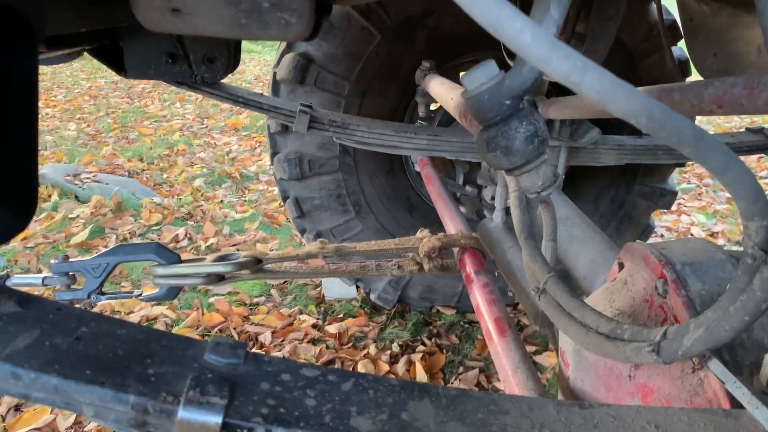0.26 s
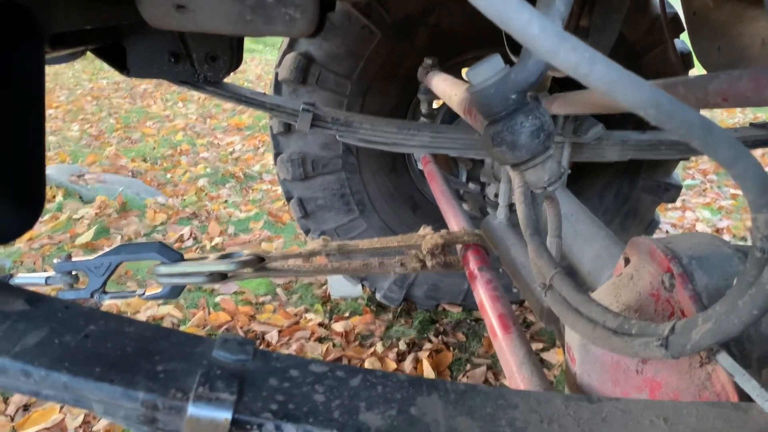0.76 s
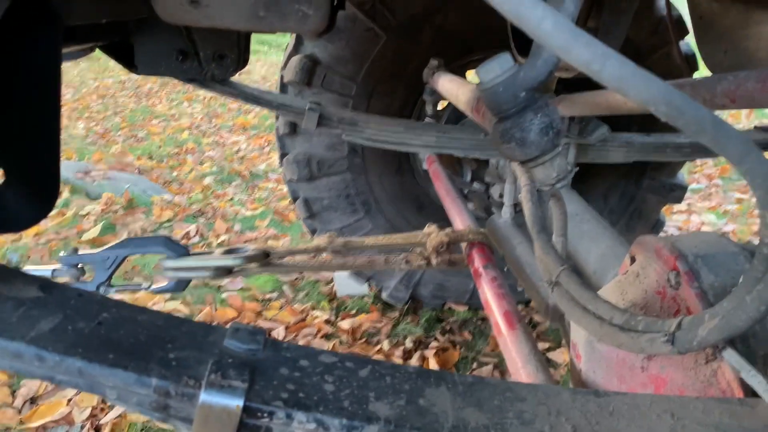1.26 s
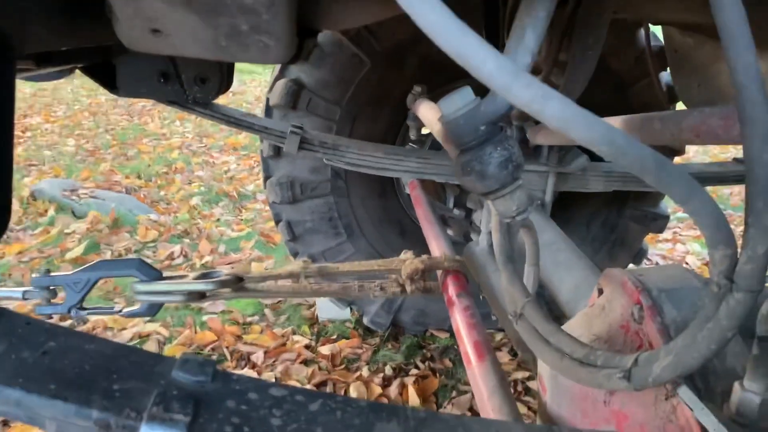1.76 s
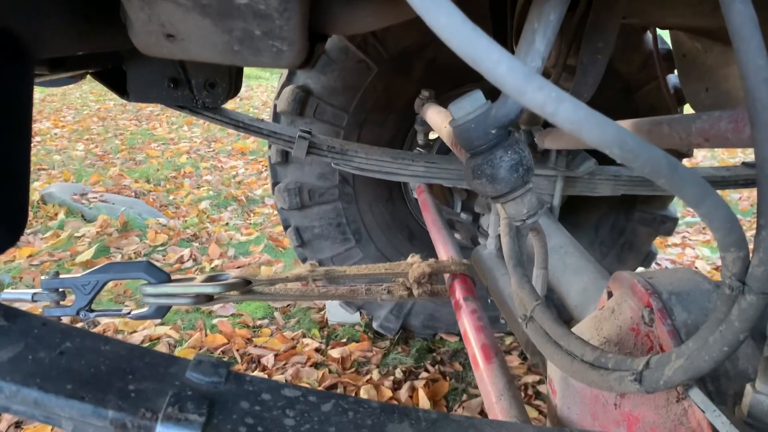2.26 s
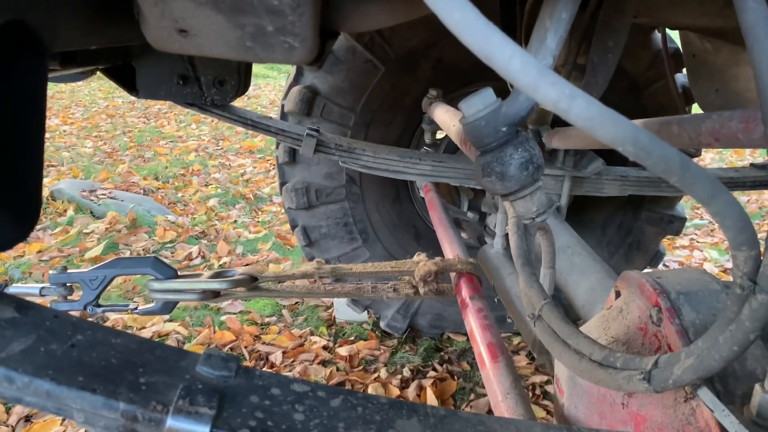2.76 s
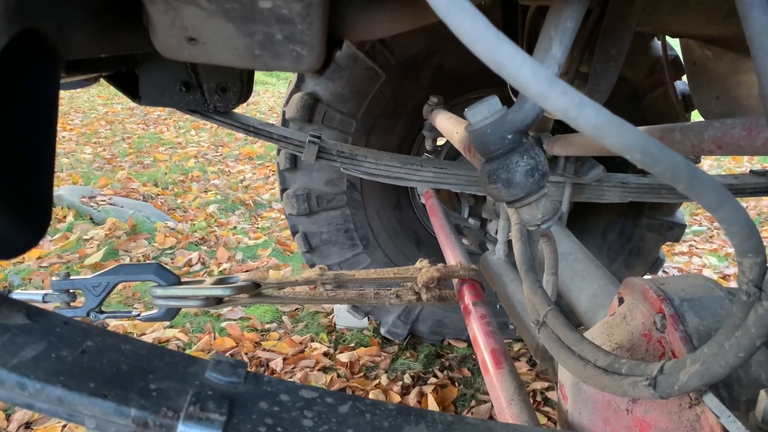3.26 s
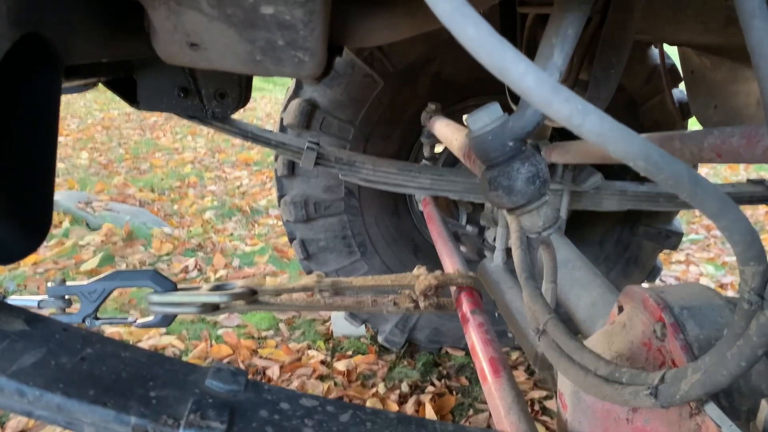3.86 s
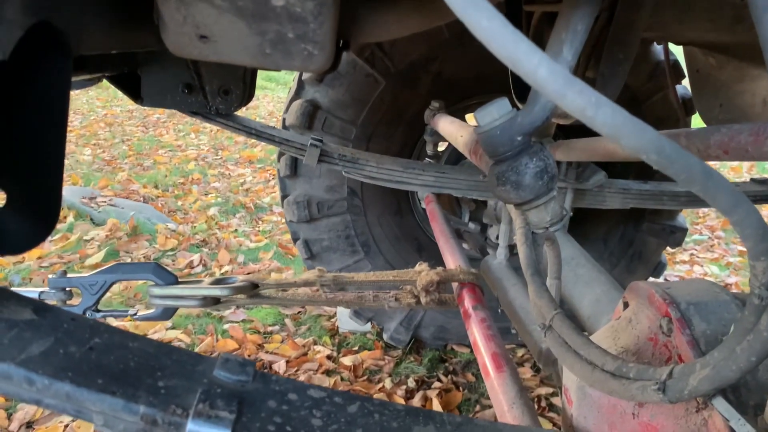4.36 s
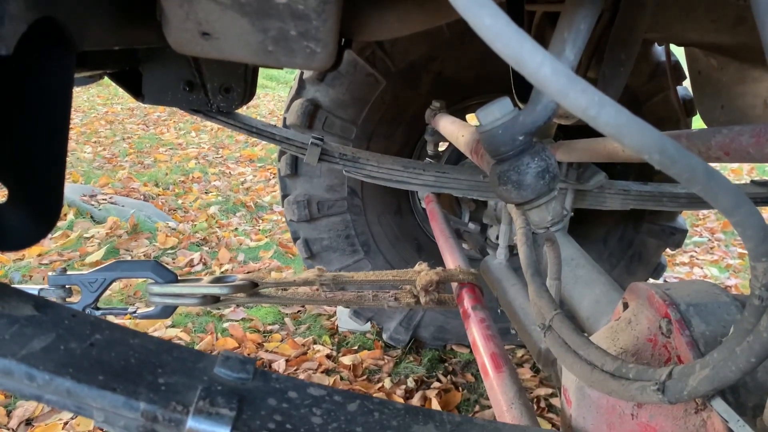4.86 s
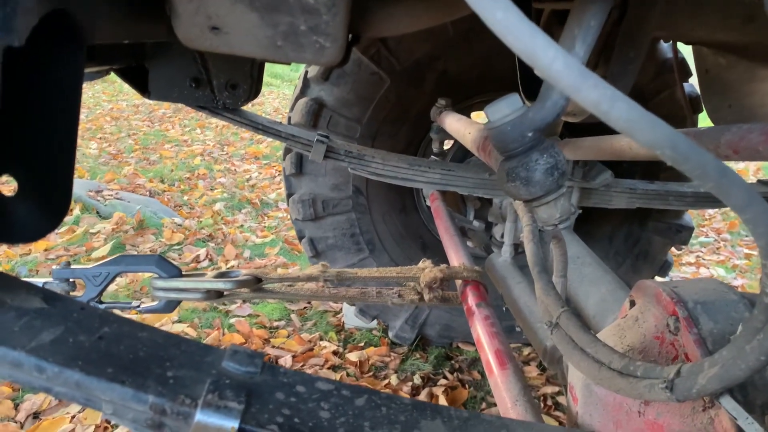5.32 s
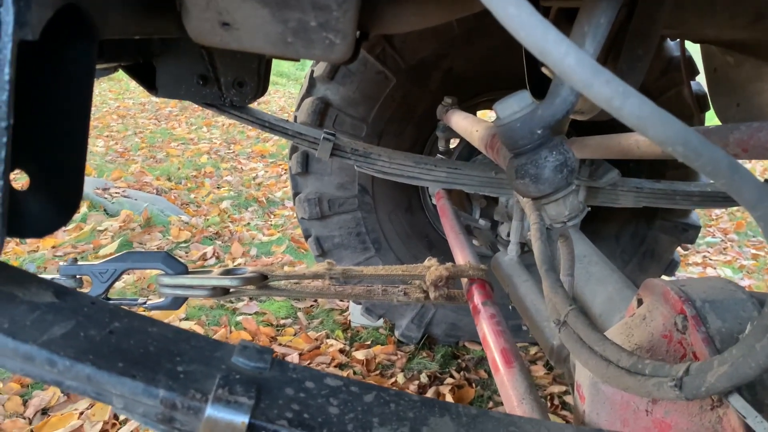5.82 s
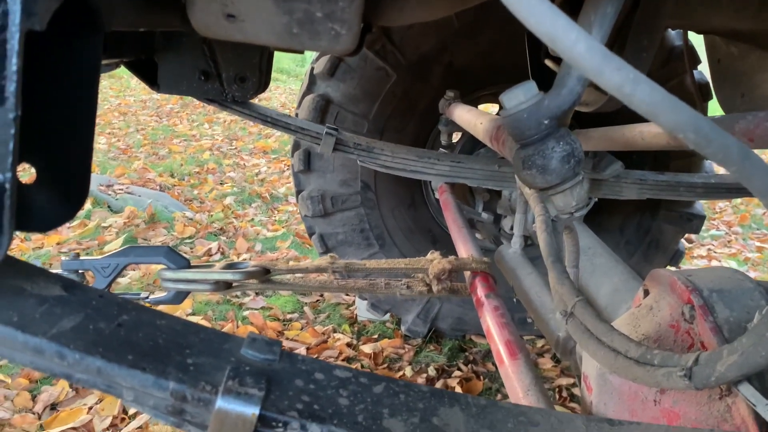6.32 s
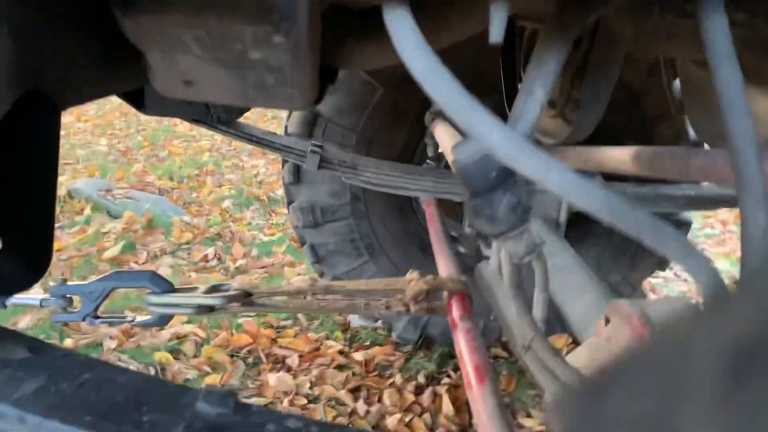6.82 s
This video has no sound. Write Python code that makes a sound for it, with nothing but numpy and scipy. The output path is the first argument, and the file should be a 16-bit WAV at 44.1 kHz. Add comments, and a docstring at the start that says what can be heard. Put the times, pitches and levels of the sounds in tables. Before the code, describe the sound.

Electric winch under an off-road vehicle jogged in short whining, rattling bursts, each ending in a ringing metallic clack, with hand-handling noise outdoors.

```python
"""An electric winch under an off-road vehicle, jogged in short bursts to tension a strap, outdoors.
Tooth blows and gear tones follow one speed curve per jog: clack, spin-up, whine, rattle, coast, locking clack.
Top speed falls from jog to jog as the strap tightens; bright scrapes mark the tight spot of the gear train.
Filtered noise bursts make the clacks and switch ticks; decaying modes make the lock ring and the jerks.
Around it: stick-slip noise of a hand on the camera, soft rustles, and a low rumble of filtered noise."""
import sys
import numpy as np
from scipy import signal
from scipy.fft import rfft, irfft, next_fast_len
from scipy.io import wavfile
from scipy.ndimage import uniform_filter1d

SR = 44100
rng = np.random.default_rng(int(sys.argv[2]) if len(sys.argv) > 2 else 0)


def transcribe(u):
    """Save the signal u as a 16-bit wav file named by the first command-line argument.

    u: samples, shape (n,) or (channels, n), limited to [-1, 1]; the rate is SR.
    q: integer samples, one column per channel.
    """
    v = np.clip(np.atleast_2d(u).T, -1, 1)
    q = np.round(v * 32767).astype(np.int16)
    wavfile.write(sys.argv[1], SR, q)


N = 312448
TIME = np.arange(N) / SR
HZ = np.fft.rfftfreq(N, 1 / SR)

# Jogs, the first already running out. Each row: start in seconds, power off in seconds, first tooth rate
# in Hz, top tooth rate in Hz, offsets of rattle, housing and frame in dB, start clack in dB,
# tint of its bright knock in dB.
JOGS = [(-0.6, -0.17, 302, 635, -1.5, -1.5, -3.5, -28, 2),
        (0.461, 0.905, 240.3, 636.9, 2.1, -1.5, 1, -30.5, -7),
        (1.957, 2.441, 300.6, 625.1, 1.85, 0.1, 0.5, -30.5, 6.5),
        (3.755, 4.325, 368.4, 607.6, 2.4, 0.8, 1.6, -32.5, 3),
        (4.981, 5.443, 333.9, 591.4, 0.33, 1, 0.5, -36.5, 1.5),
        (5.857, 6.309, 354.3, 575, 0.5, 1, 0.9, -32, 4)]
# Lock catching at the end of each jog. Each row: time in seconds, level in dB, strongest ring in Hz,
# its relative level in dB, its t60 in seconds, then the tint in each of four bands in dB.
LOCKS = [(0.072, -22.5, 2640, -7, 0.21, 6, -1, 7, -4), (1.132, -22.5, 2815, -8, 0.21, 0, 4, 7.5, -6),
         (2.5943, -22.5, 2090, -3.5, 0.18, 7, -0.5, 0, 2.5), (4.5273, -27, 1556, -1, 0.18, 9, 3.5, 8, -3),
         (5.5718, -20, 2790, -16, 0.36, 8.5, -9, 4.5, -8), (6.429, -24, 2770, -10, 0.37, 7.5, -0.5, 10, -2)]
# Spectrum of skin or fingertips on the camera case. Each row: frequency in Hz, relative density in dB.
RUB_SPECTRUM = [(100, -7.5), (430, -3.5), (680, 4), (1050, -7.5), (1550, -27.5), (1950, -18), (2350, -27),
                (2700, -26), (3200, -35), (3850, -24), (5000, -38), (6400, -33), (8200, -53.5),
                (12000, -91)]


def amp(db):
    """Decibels to gain."""
    return 10 ** (np.asarray(db) / 20)


def unit(x):
    """Scales to rms 1."""
    return x / np.sqrt(np.mean(x ** 2) + 1e-20)


def read(points):
    """Interpolates a (Hz, dB) table onto the frequency grid, on a log frequency axis."""
    hz, value = np.transpose(points)
    return np.interp(np.log(HZ + 1), np.log(hz), value)


def colour(x, gain):
    """Causal minimum-phase filter with the given gain, by folding the cepstrum."""
    cepstrum = irfft(np.log(np.maximum(gain, 1e-5)), N)
    cepstrum[1:N // 2] *= 2
    cepstrum[N // 2 + 1:] = 0
    return irfft(rfft(x) * np.exp(rfft(cepstrum)), N)


def resonances(modes):
    """Gain of summed resonances, top 1; half amplitude one width off each centre."""
    power = sum(amp(db) ** 2 / (1 + ((HZ - hz) / width) ** 2) ** 2 for hz, width, db in modes)
    return np.sqrt(power / power.max())


def noise():
    """Two unrelated white noises."""
    return rng.standard_normal((2, N))


def wander(rate_hz):
    """Slow random motion of rms 1: noise under a Gaussian low-pass."""
    size = next_fast_len(N, True)
    hz = np.fft.rfftfreq(size, 1 / SR)
    slow = rfft(rng.standard_normal(size)) * np.exp(-(hz / rate_hz) ** 2)
    return unit(irfft(slow, size)[:N])


def steady(x, window_s=0.088):
    """Evens out the short-time rms to about 1."""
    power = uniform_filter1d(x ** 2, int(window_s * SR) + 1, axis=-1)
    return x / np.sqrt(power + 1e-12)


def patchy(pair, narrow_db=4.0, broad_db=2.0):
    """Narrow bands flare and fade for some hundredths of a second, over slower shifts of broad colour."""
    z = signal.stft(pair, nperseg=1024, noverlap=768)[2]
    narrow, broad = rng.standard_normal((2, *z.shape[1:]))
    for _ in range(2):
        narrow = uniform_filter1d(uniform_filter1d(narrow, size=2, axis=0), size=7, axis=1)
        broad = uniform_filter1d(uniform_filter1d(broad, size=12, axis=0), size=11, axis=1)
    gain = amp(narrow_db * unit(narrow) + broad_db * unit(broad))
    return signal.istft(z * gain, nperseg=1024, noverlap=768)[1][:, :N]


def strokes(rows, axis, fullness, soften_s=0.014):
    """Gain curve of smoothed sine arches; a small fullness exponent flattens their tops."""
    out = np.zeros(N)
    for row in rows:
        start, length = row[:2]
        inside = (TIME > start) & (TIME < start + length)
        arch = np.sin(np.pi * (TIME[inside] - start) / length) ** abs(fullness)
        out[inside] += amp(row[axis]) * arch
    window = np.hanning(int(2 * soften_s * SR) + 3)
    return signal.fftconvolve(out, window / window.sum(), "same")


def rough_tones(rows, rough_rad, rough_hz, waver_db):
    """Short gliding tones, roughened by random phase and level."""
    out = np.zeros((2, N))
    for start, length, db, from_hz, to_hz in rows:
        span = (TIME > start) & (TIME < start + length)
        u = (TIME[span] - start) / length
        knots = np.arange(0, length + 1, 1 / rough_hz)
        glide = 2 * np.pi * np.cumsum(from_hz + (to_hz - from_hz) * u) / SR
        for channel in out:
            jitter = np.interp(u * length, knots, rng.standard_normal(len(knots)))
            waver = np.interp(u * length, knots, rng.standard_normal(len(knots)))
            tone = np.sin(glide + rough_rad * jitter)
            channel[span] += amp(db) * unit(tone * amp(waver_db * waver) * np.sin(np.pi * u) ** .5)
    return out


def underbody(pair, t60_s=.12, wet_db=-3):
    """Short dense reflections between the steel parts and the ground, as decaying noise tails."""
    t = TIME[:SR // 3]
    tail = rng.standard_normal((2, len(t))) * amp(-60 * t / t60_s)
    tail /= np.linalg.norm(tail, axis=1, keepdims=True)
    wet = signal.fftconvolve(pair, tail, axes=1)[:, :N]
    return (pair + amp(wet_db) * wet) / np.sqrt(1 + amp(wet_db) ** 2)


def clacks(rows, spectrum, hold_s, t60_s, gain_db, tail_db=-24, tail_t60_s=0.36, lead_s=.004,
           lead_db=-6, bands_hz=(), band_width=0.18):
    """Metal closes in, chatters and dies away; rows hold time, level and a tint per band (s, dB, dB..)."""
    early = SR // 40  # samples kept ahead of the blow
    t, out = TIME[:SR // 2] - early / SR, np.zeros((2, N))
    after = np.maximum(t - hold_s, 0)
    closing = amp(lead_db) * np.exp(-abs(t) / lead_s)
    dying = amp(-60 * after / t60_s) + amp(tail_db - 60 * after / tail_t60_s)
    shape = np.where(t < 0, closing, dying)
    grains = underbody(noise() * amp(1.6 * wander(460)), t60_s=0.079, wet_db=-0.5)
    chatter = unit(colour(grains, amp(read(spectrum))))
    hz = np.fft.rfftfreq(len(t), 1 / SR) + 1
    for s, db, *tints in rows:
        first = round(s * SR) - early
        span = slice(first, first + len(t))
        tint_db = sum(d * np.exp(-(np.log(hz / centre) / band_width) ** 2)
                      for centre, d in zip(bands_hz, tints))
        blow = irfft(rfft(chatter[:, span]) * amp(tint_db), len(t))
        out[:, span] += blow * shape * amp(db + gain_db)
    return out


def port_lead(delay_s):
    """Which port leads at each frequency when the left one hears the sound delay_s earlier."""
    return np.tanh(3 * np.sin(2 * np.pi * HZ * delay_s))


def spread(pair, width, direct, lead):
    """Left and right: direct sound leads at one port (+1 left, -1 right), the rest of the side is diffuse."""
    mid, other = rfft(pair)
    led = np.clip(direct, 0, 1) * lead
    side = amp(read(width)) * (1j * led * mid + np.sqrt(1 - led ** 2) * other)
    return irfft(np.array([mid + side, mid - side]), N)


def outdoors(waver_db=3.0, split_hz=320, air_db=-39.5):
    """Low distant rumble that swells, under steadier air: one coloured noise split into two bands."""
    # Each row: time in seconds, gain of the low band in dB.
    swell_points = [(0.0, -26.5), (0.42, -42.5), (1.2, -36), (1.66, -40.5), (2.7, -38.5), (4.1, -37.5),
                    (4.87, -44.5), (5.6, -34.5), (5.85, -40), (6.58, -35), (7.08, -44)]
    # Each row: frequency in Hz, relative density in dB.
    air_spectrum = [(15, -32), (25, -9), (133, -1), (164, -6), (227, -11), (281, -11.5), (322, -19),
                    (919, -19.5), (1950, -36), (2230, -44), (2420, -43), (13900, -78.5), (15500, -95)]
    swell_db = np.interp(TIME, *np.transpose(swell_points))
    air = unit(colour(noise(), amp(read(air_spectrum))))
    low = signal.sosfilt(signal.butter(3, split_hz, "low", fs=SR, output="sos"), air)
    high = signal.sosfilt(signal.butter(3, split_hz, "high", fs=SR, output="sos"), air)
    return low * amp(swell_db + waver_db * wander(14.7)) + high * amp(air_db + 0.8 * wander(5))


def rustle(uneven_db=1.5):
    """Soft, uneven dry rustle as the camera is drawn back: grainy coloured noise."""
    # Each row: start in seconds, length in seconds, level in dB.
    rustle_rows = [(6.52, 0.14, -46), (6.76, 0.13, -61.5), (6.9, 0.18, -61)]
    # Each row: frequency in Hz, relative density in dB.
    dry_spectrum = [(700, -18), (2000, -4), (4000, -8), (7000, -15), (9000, -17), (15000, -10.5)]
    grains = colour(noise() * amp(2.2 * wander(140)), amp(read(dry_spectrum)))
    return unit(grains) * strokes(rustle_rows, axis=2, fullness=0.63) * amp(uneven_db * wander(16))


def squeaks():
    """Fingers squeak and bump on the camera: short rough glides."""
    # Each row: start in seconds, length in seconds, level in dB, from Hz, to Hz.
    squeak_rows = [(6.503, 0.04, -49.5, 525, 760), (6.535, 0.067, -33, 118.6, 39.8),
                   (6.587, 0.033, -36.5, 644, 391), (6.642, 0.027, -45, 716, 664)]
    return rough_tones(squeak_rows, rough_rad=.7, rough_hz=201, waver_db=4.5)


def taps():
    """Fingertips land on the camera case: short bursts with the rub's spectrum."""
    # Each row: time in seconds, level in dB ahead of gain_db.
    tap_rows = [(1.226, -31), (1.593, -39), (1.78, -41), (2.863, -40), (2.942, -37.5), (3.157, -36),
                (6.594, -31)]
    return clacks(tap_rows, RUB_SPECTRUM, hold_s=0.004, t60_s=0.077, gain_db=-2.5, tail_t60_s=0.1,
                  lead_s=0.0015)


def hand(body_db=0.33, grain_db=1.1, uneven_db=2.5, hiss_db=3, hiss_hz=11700, hiss_width_hz=1100):
    """Skin sticks and slips on the camera case: grainy body noise plus a fine resonant hiss."""
    # Each row: start in seconds, length in seconds, body in dB, fine hiss in dB; both ahead of the gains.
    rub_rows = [(1.219, 0.06, -29.5, -57), (1.31, 0.42, -32.5, -54.5), (1.588, 0.041, -55, -52),
                (1.775, 0.18, -31, -66), (1.835, 0.059, -32, -73), (2.855, 0.22, -37.5, -91),
                (3.05, 0.14, -33.5, -66), (3.475, 0.145, -41, -83), (4.664, 0.064, -38.5, -72),
                (6.505, 0.072, -32.5, -51.5), (6.587, 0.059, -37, -53)]
    slips = noise() * amp(grain_db * wander(200))
    body = steady(colour(slips, amp(read(RUB_SPECTRUM)))) * strokes(rub_rows, axis=2, fullness=0.5)
    body *= amp(body_db + uneven_db * wander(32.1))
    hiss = unit(colour(slips, resonances([(hiss_hz, hiss_width_hz, 0)])))
    hiss *= strokes(rub_rows, axis=3, fullness=1.4)
    return body + amp(hiss_db) * hiss


def switch_ticks():
    """The switch ticks: very short bright bursts."""
    # Each row: time in seconds, level in dB ahead of gain_db.
    tick_rows = [(0.342, -35.5), (1.8322, -55), (3.1194, -36), (3.6346, -33), (3.6554, -38.5),
                 (4.6718, -39), (4.859, -39), (4.8911, -45), (5.6618, -28), (5.7294, -37)]
    # Each row: frequency in Hz, relative density in dB.
    tick_spectrum = [(200, 5), (470, 12), (800, 5), (1200, 15), (1700, 6), (2400, 10), (3400, -5),
                     (6000, -3.5), (8000, -13), (12000, -2), (15000, 2)]
    return clacks(tick_rows, tick_spectrum, hold_s=0.0015, t60_s=0.031, gain_db=-5.0, tail_db=-20,
                  tail_t60_s=0.15, lead_s=0.0012)


def start_clacks():
    """Power comes on: a bright snap of the contacts and a heavier clack with a knock near 4 kHz."""
    # Both spectra, each row: frequency in Hz, relative density in dB.
    snap_spectrum = [(5000, -31), (10000, -2), (15000, 8)]
    clack_spectrum = [(100, -52.5), (300, -21), (400, -9), (520, 2), (680, -6), (950, -20), (2000, -18.5),
                      (2700, -20), (3400, -25.5), (4200, -15.5), (5500, -36.5), (8000, -28), (12000, -18.5),
                      (15000, -22.5)]
    starts = [(s, db, knock_db) for s, *_, db, knock_db in JOGS if s > 0]
    snap = clacks(starts, snap_spectrum, hold_s=.005, t60_s=.025, gain_db=5.0, tail_db=-26,
                  tail_t60_s=.1, lead_s=.002)
    return snap + clacks(starts, clack_spectrum, hold_s=0.0086, t60_s=0.06, gain_db=13.5,
                         lead_s=0.0044, lead_db=0.0, bands_hz=[4000])


def lock_clacks():
    """The lock catches: a broadband clack, tinted differently each time."""
    # Each row: frequency in Hz, relative density in dB.
    stop_spectrum = [(100, 4), (200, 5.5), (400, 2.5), (700, 8), (1100, 0.5), (1500, -1), (2200, 3),
                     (2800, -1), (3400, -5.5), (4200, 2.5), (6000, -16), (8500, -18), (12000, -16),
                     (15000, -13.5)]
    # Centres of the four tinted bands in Hz.
    tint_bands_hz = [1460, 1870, 2820, 4430]
    stops = [(s, db, *tints) for s, db, _, _, _, *tints in LOCKS]
    return clacks(stops, stop_spectrum, hold_s=0.0108, t60_s=0.1, gain_db=-2.5, tail_db=-20.5,
                  tail_t60_s=0.42, lead_s=0.004, lead_db=-2.5, bands_hz=tint_bands_hz)


def lock_ring(ring_db=-7, rise_s=0.0054):
    """The lock rings on after each stop: decaying modes plus one of its own per stop."""
    # Each row: frequency in Hz, level in dB ahead of ring_db, t60 in seconds.
    lock_modes = [(675, -4.5, 0.4), (1250, -9.5, 0.24), (1420, -9, 0.36), (1490, -12, 0.25),
                  (1820, -10, 0.27), (2020, -29.5, 0.36), (2230, -12, 0.22), (2790, -16, 0.36),
                  (2880, -18, .14), (3670, 10.5, 0.044), (4000, -0.5, 0.1), (5370, -6, 0.085)]
    t, out = TIME[:SR // 2], np.zeros((2, N))
    for s, db, main_hz, main_db, main_t60_s, *_ in LOCKS:
        modes = [(hz, d + ring_db, t60_s) for hz, d, t60_s in lock_modes]
        modes.append((main_hz, main_db, main_t60_s))
        ring = sum(amp(d - 60 * t / t60_s) * np.sin(2 * np.pi * (hz * t + rng.random((2, 1))))
                   for hz, d, t60_s in modes)
        part = out[:, round(s * SR):][:, :len(t)]
        part += (amp(db) * ring * (1 - np.exp(-t / rise_s)))[:, :part.shape[1]]
    return out


def jerks(rise_s=0.0032, ring_t60_s=0.09, crack_db=-19, crack_t60_s=0.01, thud_db=-12, thud_hz=215,
          thud_t60_s=0.081):
    """The load jerks the housing: a decaying ring, a dull crack and a thud in the frame."""
    # Each row: time in seconds, level in dB, ring in Hz.
    jerk_rows = [(0.71, -6.5, 646), (0.744, -4, 630), (2.263, -3, 610), (2.282, 0, 646),
                 (3.867, -18.5, 563), (4.136, -5.5, 602), (5.069, -10, 630), (5.235, -0.5, 635),
                 (5.664, -24, 495.4), (5.949, -13, 560), (5.976, -15.5, 595), (6.124, -12.5, 564),
                 (6.283, -10.5, 589.6)]
    t, out = TIME[:SR // 4], np.zeros((2, N))
    for s, db, hz in jerk_rows:
        ring = np.sin(2 * np.pi * hz * t) * amp(-60 * t / ring_t60_s)
        thud = np.sin(2 * np.pi * thud_hz * t) * amp(thud_db - 60 * t / thud_t60_s)
        dull = signal.lfilter([1], [1, -1.5, .6], rng.standard_normal((2, len(t))))
        crack = unit(dull)
        crack *= amp(crack_db - 60 * t / crack_t60_s)
        out[:, round(s * SR):][:, :len(t)] += amp(db) * ((ring + thud) * (1 - np.exp(-t / rise_s)) + crack)
    return out


def groans():
    """The frame groans as the motor runs down: rough falling tones."""
    # Each row: start in seconds, length in seconds, level in dB, from Hz, to Hz.
    groan_rows = [(1.0, 0.08, -29.5, 247.7, 171), (2.42, 0.06, -30, 262, 231),
                  (2.475, 0.06, -27, 218.3, 130), (4.36, 0.22, -32, 261.7, 235.5),
                  (5.44, 0.075, -38.5, 272.6, 125), (5.64, 0.06, -37, 201.6, 195)]
    return rough_tones(groan_rows, rough_rad=0.9, rough_hz=90, waver_db=4)


def singing():
    """The gearbox sings for a while under load: gliding tones."""
    # Each row: start in seconds, length in seconds, level in dB, from Hz, to Hz.
    singing_rows = [(0.58, 0.084, -32, 2930, 2990), (0.69, 0.14, -47, 4860, 5160),
                    (2.12, 0.13, -31.5, 1785, 1860), (2.24, 0.18, -48, 1720, 1650),
                    (4.09, 0.32, -32, 1633, 1670), (4.22, 0.188, -35.5, 1806, 1830),
                    (6.04, 0.38, -37.5, 1682, 1647)]
    return rough_tones(singing_rows, rough_rad=0.43, rough_hz=129.0, waver_db=-0.5)


def motion(flutter=.005, spin_up_s=0.08, lock_hz=361.4, coast_bend=1.4, teeth_per_turn=88):
    """The motor spins up exponentially, pulls, and coasts ever faster down to lock_hz, where it locks."""
    # One pass of the tight spot in each jog, in seconds.
    tight_spots_s = [-0.2, 0.700, 2.270, 4.173, 5.225, 6.106]
    latest = np.maximum(np.searchsorted([row[0] for row in JOGS], TIME, side="right") - 1, 0)
    start, off, first_hz, top_hz, rattle_db, housing_db, frame_db, *_ = np.array(JOGS)[latest].T
    lock = np.array(LOCKS)[latest, 0]
    age = np.maximum(TIME - start, 0)
    coast = np.clip((TIME - off) / (lock - off), 0, 1)
    hz = top_hz + (first_hz - top_hz) * np.exp(-age / spin_up_s)
    hz += (lock_hz - hz) * coast ** coast_bend
    teeth = np.cumsum(hz * (1 + flutter * wander(40))) / SR
    turns = (teeth - np.interp(tight_spots_s, TIME, teeth)[latest]) / teeth_per_turn
    return dict(teeth=teeth, turns=turns, age=age, coast=coast, since_off=TIME - off,
                since_lock=TIME - lock, rattle_db=rattle_db, housing_db=housing_db, frame_db=frame_db)


def envelope(run, level_db, start_db, build_s, coast_db, bend, throb_db, lag_turns, fall_s, rise_s=0.011):
    """Gain of one part: moves off its start level, throbs once a turn, sinks in the coast, dies after lock."""
    db = level_db + start_db * np.exp(-(run["age"] / build_s) ** 2) + coast_db * run["coast"] ** bend
    db += throb_db * np.cos(2 * np.pi * (run["turns"] - lag_turns))
    rise = np.minimum(run["age"] / rise_s, 1)
    return amp(db) * rise * np.clip(1 - run["since_lock"] / fall_s, 0, 1)


def pulling(run, spin_up_s, slack_s=0.033, let_go_s=0.084):
    """1 while the motor pulls at speed, ramping from 0 at the start and back after power off."""
    ramp_up = np.clip((run["age"] - slack_s) / spin_up_s, 0, 1)
    return ramp_up * np.clip(1 - run["since_off"] / let_go_s, 0, 1)


def running_up(run, centre_s=0.08, width_s=0.045):
    """1 in mid run-up, where the teeth sing cleanly before the load shakes the housing."""
    return np.exp(-((run["age"] - centre_s) / width_s) ** 2)


def tooth_blows(teeth, uneven_db=5, hiss=0.5):
    """One uneven blow for each tooth, over the hiss of sliding metal."""
    hit = np.diff(np.floor(teeth), prepend=0) > 0
    blows = hit * amp(uneven_db * np.clip(noise(), -2, 2)) * np.sign(noise())
    return unit(blows) + hiss * noise()


def scrapes(teeth, swell_s=0.02, fade_s=0.022):
    """The tight spot of the gear train scrapes past: a bright swell of tooth noise each time."""
    # Each row: time in seconds, level in dB.
    scrape_rows = [(0.552, -31), (0.698, -28.5), (0.838, -26.5), (2.117, -30), (2.272, -31), (2.402, -31),
                   (3.865, -26), (4.021, -25), (4.176, -23), (4.316, -25), (5.064, -30.5), (5.223, -25.5),
                   (5.375, -26), (5.931, -28.5), (6.101, -25.5), (6.268, -27.5)]
    # Each row: frequency in Hz, relative density in dB.
    scrape_spectrum = [(1000, -27), (2500, -16), (3800, 8), (4700, -0.5), (5900, 0), (6800, 11), (7500, 2),
                       (8350, 13), (9000, 0), (12000, -11.5), (15000, -8.5)]
    swell = np.zeros(N)
    for s, db in scrape_rows:
        peak = 1 / (1 + ((TIME - s) / np.where(TIME < s, swell_s, fade_s)) ** 2)
        swell += amp(db) * peak * np.exp(-((TIME - s) / (4 * swell_s)) ** 2)
    rasp = patchy(underbody(tooth_blows(teeth), t60_s=0.014, wet_db=3.5), narrow_db=7.0)
    return steady(colour(rasp, amp(read(scrape_spectrum)))) * swell


def growl(teeth, shaking, count=6, order_db=(-8, -7, -12), throb_db=3):
    """The shaft shakes the frame on its three lowest orders, which sink as it runs down."""
    turn = 2 * np.pi * teeth / count
    orders = [amp(db) * unit(np.sin(k * turn) * amp(throb_db * wander(22.0)))
              for k, db in enumerate(order_db, 1)]
    return sum(orders) * shaking


def mount(drive, mount_db=0.5):
    """Narrow modes of the steel mount, fed by noise at the rattle's level and ringing on after it."""
    # Each row: frequency in Hz, width in Hz, level in dB ahead of mount_db, phase between ports in radians.
    steel_modes = [(870, 28, -10, 3.2), (996, 12, -7.5, 2.9), (1101, 17, -14, 1.87),
                   (1183, 13, -12.5, 0.36), (1400, 39, -6.5, 2.44), (1552, 16, -5, 2.6),
                   (1815, 20, -15, 0.42), (2151, 38, -16.5, 0.67), (3825, 34, -14.5, 0.5),
                   (4000, 59, -23.5, 0.85), (4150, 28, -15.5, 0.72), (4940, 23, -36.5, .8)]
    t, out = TIME[:SR // 2], np.zeros((2, N))
    for hz, width, db, phase in steel_modes:
        ring = np.exp((2j * np.pi * hz - np.pi * width) * t)
        mode = signal.fftconvolve(drive * rng.standard_normal(N), ring / np.linalg.norm(ring.real))[:N]
        out += amp(db + mount_db) * (mode * np.exp(.5j * phase * np.array([[1], [-1]]))).real
    return out


def grind(teeth, count=6, size=400, shift_hz=7):
    """Rough flanks of the six-tooth pinion repeat each turn; contact wanders between two tracks on them."""
    flanks = rng.standard_normal((2, 2, size)) * amp(2.4 * rng.standard_normal((2, 2, size)))
    place = teeth / count % 1 * size
    inner, outer = np.array([[np.interp(place, np.arange(size), flank) for flank in track]
                             for track in flanks])
    shift = np.pi / 2 * wander(shift_hz)
    return unit(inner * np.cos(shift) + outer * np.sin(shift))


def backlash(metal, per_s=130, uneven_db=3, backlash_db=-12, dull_hz=4000):
    """Loose teeth slap across their play at random moments: short, dry knocks."""
    slaps = (rng.random(N) < per_s / SR) * amp(uneven_db * np.minimum(rng.exponential(1, N), 2))
    dull_metal = metal / (1 + (HZ / dull_hz) ** 4)
    return unit(colour(slaps * np.sign(noise()), dull_metal)) * amp(backlash_db)


def overtones(run, rattling, swell_db=4, rough_rad=0.74, spin_up_s=0.075):
    """Higher gear tones rise with the speed and swell at random, as if crossing resonances."""
    # Each row: multiple of the tooth rate, level in dB.
    overtone_rows = [(1.999, -16.5), (2.74, -14.5), (3, -11.5), (4, -18.5), (5, -18.5), (5.999, -15.5),
                     (6.999, -13.5)]
    out = np.zeros((2, N))
    for multiple, db in overtone_rows:
        phase = 2 * np.pi * (multiple * run["teeth"] + rng.random((2, 1)))
        tone = np.sin(phase + rough_rad * wander(80))
        out += amp(db) * unit(tone * amp(swell_db * np.clip(wander(23), -1.5, 1.5)))
    return underbody(out * pulling(run, spin_up_s), t60_s=0.093, wet_db=1.5) * rattling


def whine(run, droning, whine_db=-4.0, waver_db=2.5, loose_rad=0.7, tight_rad=0.44, settle_s=0.27,
          spin_up_s=0.12):
    """Tone of the meshing teeth: rough while they have play, cleaner once the load holds them together."""
    play = loose_rad + (tight_rad - loose_rad) * pulling(run, settle_s)
    play *= 1 - .5 * running_up(run)
    quarter_turn = np.array([[0], [np.pi / 2]])
    tone = np.sin(2 * np.pi * run["teeth"] + play * wander(52) + quarter_turn)
    tone = unit(tone * amp(waver_db * np.clip(wander(80), -2, 1.3)))
    return tone * amp(whine_db) * pulling(run, spin_up_s) * droning


def gears(teeth, rattling, droning, shaking, ring_db=2, drone_db=-5, grind_db=-4):
    """Tooth blows ring the gearbox (rattle), its housing (drone) and the vehicle frame (rumble)."""
    # Resonances, each row: frequency in Hz, half-width in Hz, level in dB (the gearbox uses a quarter of it).
    gearbox_modes = [(2320, 73, 4), (2720, 150, -3), (2920, 52, -13), (3170, 76, 3.5), (3710, 63, 14.5),
                     (4000, 41, -15), (4480, 27, -6.5), (5370, 22, -29), (6570, 43, -21.5),
                     (6630, 190, 4.5), (7200, 23, -6), (8200, 120, -12.5), (8100, 220, 1)]
    housing_modes = [(480, 2.6, -6.5), (567, 190, -2.5), (629.7, 12.4, 15), (680, 6.1, 11), (799, 30, -3)]
    # Spectra, each row: frequency in Hz, relative density in dB.
    rattle_spectrum = [(300, -21.5), (480, 9.5), (800, 2.5), (1100, 4), (1700, 0), (2000, -4), (2600, -1),
                       (3400, -5), (4000, -5), (5200, -6), (6000, -12), (6800, -11.5), (8400, -17.5),
                       (15000, -14.5)]
    frame_spectrum = [(21, -30), (35, -13.5), (96, -1.5), (145, -4.5), (204, 1.5), (235, 2), (310, -3.5),
                      (342, -4.5), (412, -3), (480, -3.5), (620, -23.5), (1060, -120)]
    ringing = resonances([(hz, width, db / 4) for hz, width, db in gearbox_modes])
    metal = amp(read(rattle_spectrum)) * (1 + amp(ring_db) * ringing)
    contact = tooth_blows(teeth) + amp(grind_db) * grind(teeth)
    rattle = steady(patchy(colour(underbody(contact, t60_s=0.26, wet_db=1.5), metal)))
    rattle = (rattle + backlash(metal)) * amp(0.93 * wander(42)) * rattling
    drone = steady(colour(tooth_blows(teeth), resonances(housing_modes)), window_s=0.11)
    drone *= amp(drone_db) * droning
    rumble = steady(patchy(colour(tooth_blows(teeth), amp(read(frame_spectrum)))), window_s=0.068)
    return rattle + drone + rumble * shaking


def scene():
    """The winch close by, with the hand and the outdoors around it."""
    # The gears bind and the hum surges. Each row: start in seconds, length in seconds, level in dB.
    surge_rows = [(0.545, 0.14, -6.5), (0.68, 0.12, 2), (0.836, 0.12, -1), (2.018, 0.05, -5),
                  (2.125, 0.076, 0.5), (2.31, 0.06, -0.5), (2.398, 0.038, -1.5), (2.475, 0.054, -5),
                  (3.86, 0.072, 1.5), (3.937, 0.038, 0), (4.013, 0.05, -3.5), (4.085, 0.032, -1.5),
                  (4.15, 0.072, -5.5), (4.235, 0.06, -1.5), (4.31, 0.06, -5.5), (5.07, 0.029, -4.5),
                  (5.268, 0.062, -5), (5.372, 0.069, -5.5), (5.475, 0.036, 1), (5.935, 0.042, -1.5),
                  (6.097, 0.071, 0), (6.172, 0.046, -5), (6.233, 0.0086, 3), (6.275, 0.066, -3)]
    # Stereo widths of winch and surroundings. Each row: frequency in Hz, side minus mid in dB.
    winch_width = [(60, -13), (92, -31.5), (140, -6.5), (210, -36), (330, -9.5), (500, -9), (770, -6),
                   (1170, 5.5), (1790, 1), (2740, 2), (4190, -1), (6410, -6), (9810, 11.5), (11200, 7),
                   (15000, -32)]
    near_width = [(60, -12), (150, -12.5), (380, -9.5), (950, 1), (2380, 1.5), (5980, -0.5), (15000, 10)]
    around = outdoors() + rustle() + squeaks() + taps() + hand()

    run = motion()
    teeth = run["teeth"]
    rattling = amp(run["rattle_db"]) * envelope(
        run, level_db=-26.5, start_db=-2.0, build_s=0.15, coast_db=-25.0, bend=1.5,
        throb_db=0.94, lag_turns=0.22, fall_s=0.015)
    droning = amp(run["housing_db"]) * envelope(
        run, level_db=-18.5, start_db=2.0, build_s=0.21, coast_db=-10.0, bend=3.3,
        throb_db=1.0, lag_turns=0.29, fall_s=0.075)
    shaking = amp(run["frame_db"]) * envelope(
        run, level_db=-26.0, start_db=-15.5, build_s=0.1, coast_db=-9.0, bend=1.8,
        throb_db=0.95, lag_turns=0.32, fall_s=0.18)
    surging = strokes(surge_rows, axis=2, fullness=0.34, soften_s=.003)
    droning *= amp(-2.5) + surging
    shaking *= amp(-2.0) + amp(-13) * surging

    # in the run-up the whine stands out and the drone steps back
    winch = gears(teeth, rattling, droning * amp(-2 * running_up(run)), shaking)
    winch += whine(run, droning * amp(5 * running_up(run))) + overtones(run, rattling)
    winch += growl(teeth, shaking) + scrapes(teeth) + singing() + groans() + jerks()
    winch += start_clacks() + lock_clacks() + lock_ring() + switch_ticks()

    # a negative delay: the right port hears the winch first
    winch = spread(winch, winch_width, direct=0.83, lead=port_lead(delay_s=-0.00045))
    around = spread(around, near_width, direct=0.66, lead=port_lead(delay_s=0.00025))
    return winch + mount(rattling) + around


def record(dry, edge_hz=15900):
    """Overall colour (weak deep bass and a dip near 10 kHz), left-right balance, then the band limit."""
    # Each row: frequency in Hz, gain in dB.
    tone_balance = [(20, -30), (32, -18.5), (48, 1.5), (80, -2), (8500, -1), (9200, -16.5), (9900, -36.5),
                    (10700, -15), (11300, -7), (12200, -11), (13000, -15), (16000, -27.5)]
    # Each row: frequency in Hz, left minus right in dB.
    lean_points = [(2400, -0.5), (4300, 2.5), (8000, 0)]
    heard = colour(dry, amp(read(tone_balance)))
    heard = irfft(rfft(heard) * amp(.5 * read(lean_points) * np.array([[1], [-1]])), N)
    low_pass = signal.firwin(511, edge_hz, window=("kaiser", 9), fs=SR)
    return signal.oaconvolve(heard, low_pass[None], "same")


dry = scene()
out = record(dry)
transcribe(out)
```